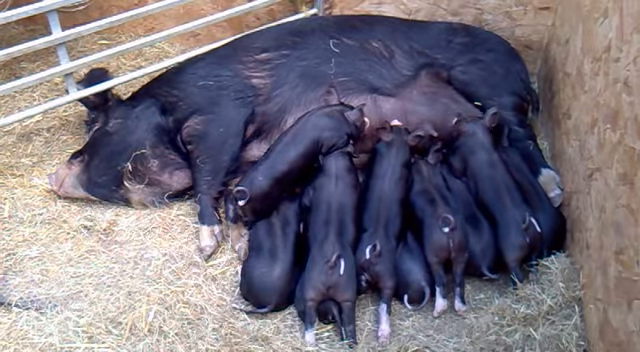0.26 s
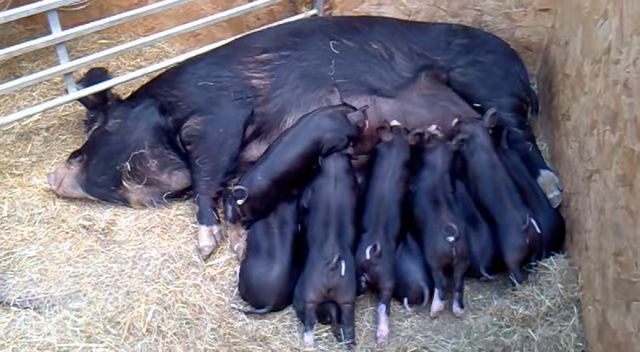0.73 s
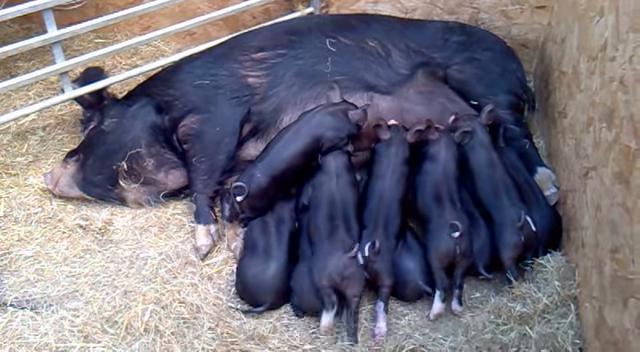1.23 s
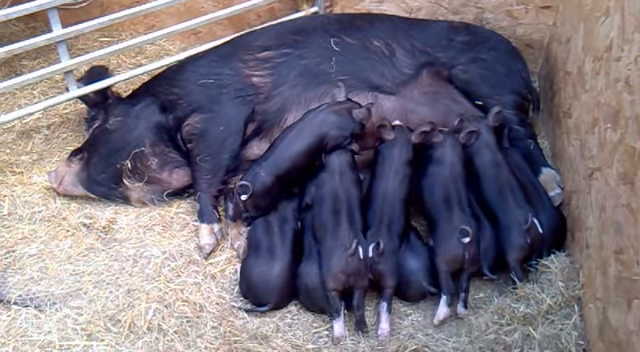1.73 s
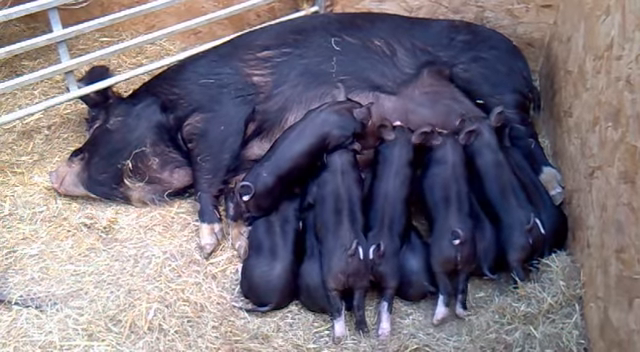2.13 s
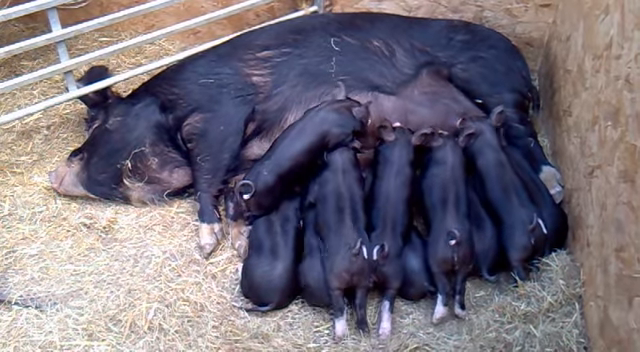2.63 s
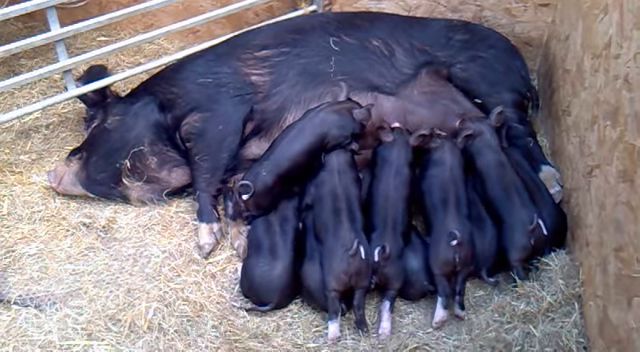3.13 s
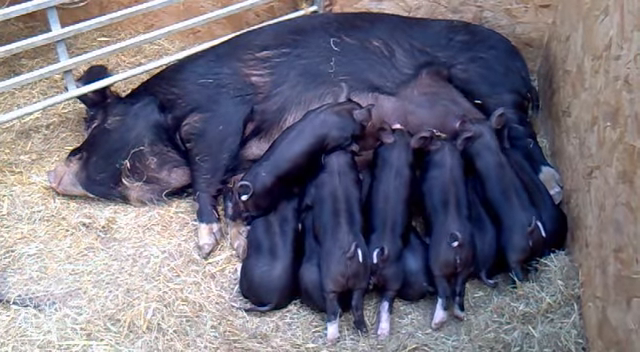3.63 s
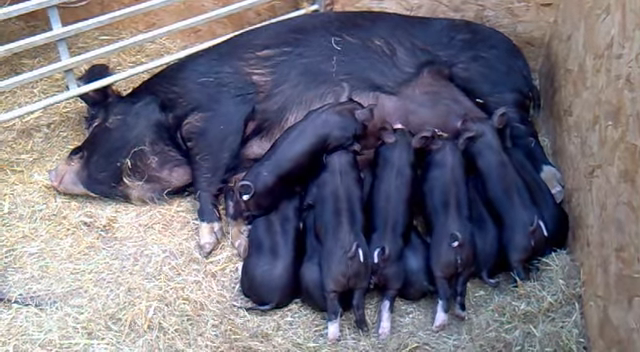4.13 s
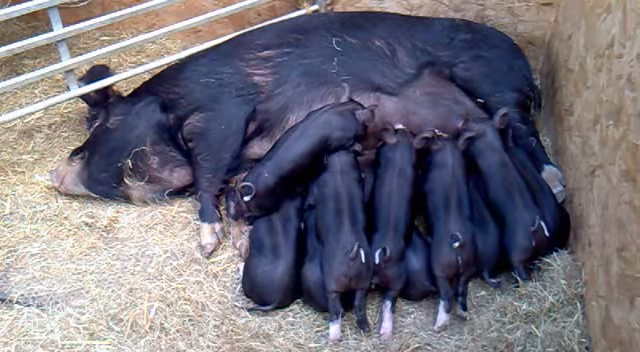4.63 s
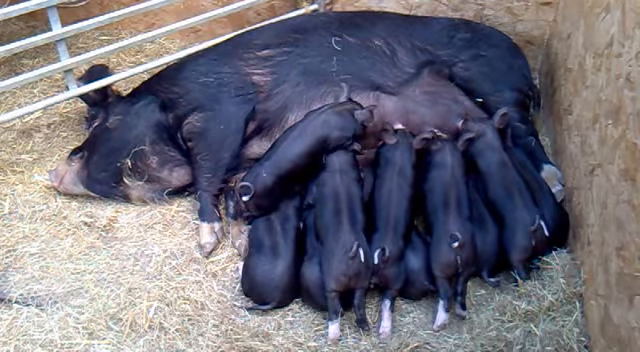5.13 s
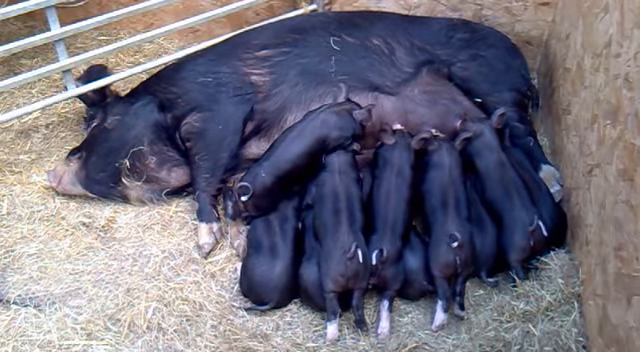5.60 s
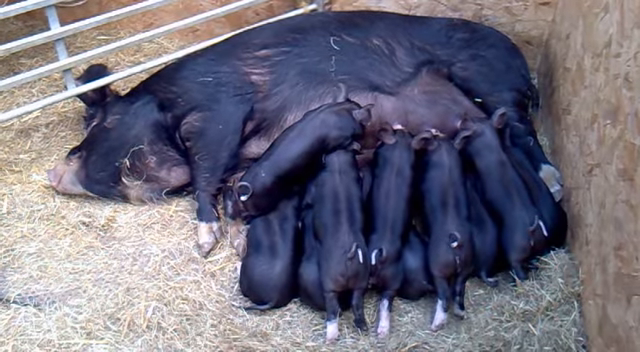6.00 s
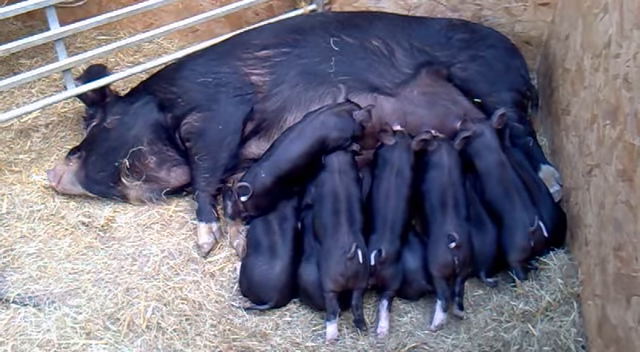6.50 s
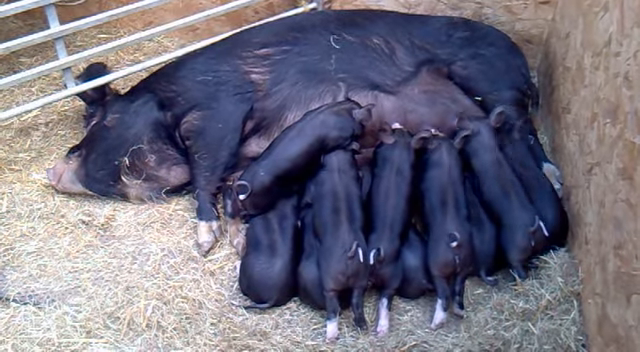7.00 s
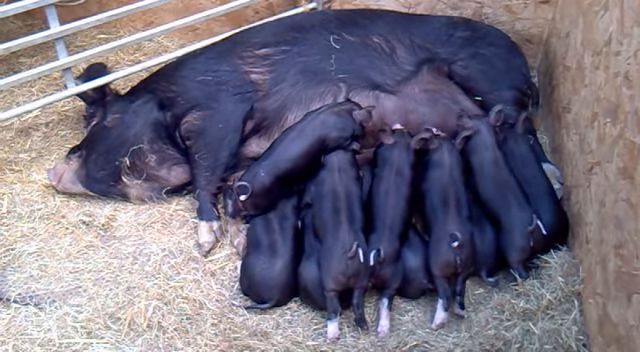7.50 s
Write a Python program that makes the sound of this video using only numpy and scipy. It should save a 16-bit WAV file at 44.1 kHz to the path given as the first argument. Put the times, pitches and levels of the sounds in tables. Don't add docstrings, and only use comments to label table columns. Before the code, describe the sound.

A big sow gives low, rattling grunts in quick bursts of three to five pulses while her piglets smack, gulp and rustle the straw.

```python
import sys
import numpy as np
from scipy import signal
from scipy.io import wavfile
from scipy.ndimage import uniform_filter1d

SR = 44100
rng = np.random.default_rng(int(sys.argv[2]) if len(sys.argv) > 2 else 0)


def output_pcm(signal):
    pcm = np.clip(np.atleast_2d(signal).T, -1, 1) * 32767
    wavfile.write(sys.argv[1], SR, np.round(pcm).astype(np.int16))


def gain_from_db(level_db):
    decades = np.asarray(level_db, float) / 20
    return 10 ** decades


N = 341775

# delay from the snap in ms, signed gain.
REFLECTIONS = [(-6.6, -.5), (-3.7, -.45), (-1.5, .47), (1.5, -.54), (5.06, .6), (5.97, -1), (8.28, -.46),
               (11.4, .57), (12.54, -.72), (18.2, -.68), (19.34, .73), (20.57, -.59), (25.47, -.47)]


def at_hz(points, hz):
    table_hz, values = np.transpose(points)
    return np.interp(np.log(hz), np.log(table_hz), values)


def in_time(rows):
    s, *columns = np.transpose(rows)
    return [np.interp(np.arange(N) / SR, s, c) for c in columns]


def rms_one(x):
    return x / np.sqrt(np.mean(x ** 2) + 1e-20)


def resonance(x, hz, width_hz):
    r = np.exp(-np.pi * width_hz / SR)
    top = [(1 - r * r) / 2, 0, (r * r - 1) / 2]
    return signal.lfilter(top, [1, -2 * r * np.cos(2 * np.pi * hz / SR), r * r], x + 1e-18)


def butter(x, hz, kind, order=2):
    return signal.sosfilt(signal.butter(order, hz, kind, fs=SR, output="sos"), x)


def clicks(s, sizes):
    out, at = np.zeros(N), np.round(s * SR).astype(int)
    np.add.at(out, at[at >= 0], sizes[at >= 0])
    return out


def drift(rate_hz):
    return rms_one(butter(rng.standard_normal(N + SR), rate_hz, "low")[SR:])


def banded(spectrum, patchy_db):
    white, together = rng.standard_normal((2, N)), drift(1.4)
    edges = 22 * 2 ** np.arange(0, 9.6, .5)
    out = np.zeros(N)
    for k, (low, high) in enumerate(zip(edges, edges[1:])):
        level_db = at_hz(spectrum, np.sqrt(low * high)) + patchy_db * (together + drift(45.0))
        out += gain_from_db(level_db) * butter(white[k % 2], [low, high], "band")
    return rms_one(out)


def bursts(rows, spread, attack_s):
    out, t = np.zeros(N + SR), np.arange(SR // 4) / SR
    white = rng.standard_normal((len(rows), len(t)))
    for (s, db, hz, t60), noise in zip(rows, white):
        shape = (1 - np.exp(-t / attack_s)) * gain_from_db(-60 * t / t60)
        burst = butter(noise * shape, [hz / spread, min(hz * spread, .45 * SR)], "band")
        out[round(s * SR):][:len(t)] += gain_from_db(db) * burst / abs(burst).max()
    return out[:N]


def pen(x, from_s, damping=1):
    # frequency in Hz, reverberation time (t60) in s.
    decay = [(100, 0.26), (300, 0.34), (700, 0.29), (1800, 0.2), (5000, 0.19)]
    t, edges = np.arange(SR // 2) / SR, 40 * 2 ** np.arange(0, 9.)
    white = rng.standard_normal(len(t))
    tail = np.zeros(len(t))
    for low, high in zip(edges, edges[1:]):
        t60 = at_hz(decay, np.sqrt(low * high))
        tail += butter(white, [low, high], "band") * gain_from_db(-60 * damping * t / t60)
    tail *= np.clip((t - from_s) / .012, 0, 1)
    return signal.fftconvolve(x, tail / np.linalg.norm(tail))[:N]


def box(x):
    # mode frequency in Hz, level in dB, t60 in s.
    air_modes = [(149.8, -10, 0.317), (177.4, 2, 0.19), (271.1, -1, 0.2), (379.5, -2, 0.26),
                 (412.5, 0, 0.31), (490.2, 6, 0.17), (557, 12, 0.14), (614, 2.5, 0.23), (670, -2, 0.31),
                 (717, -24, 0.45), (738, 13, 0.14), (910, 7.5, 0.091), (940, -31, 0.11), (1049, 4, 0.17),
                 (1150, -1.5, 0.2), (1163, 4.5, 0.16), (1354, -14.5, 0.18)]
    t = np.arange(SR // 2) / SR
    build = np.clip((t - .016) / .016, 0, 1)
    phases = rng.uniform(0, 2 * np.pi, len(air_modes))
    rings = np.zeros(len(t))
    for (hz, db, t60), phase in zip(air_modes, phases):
        rings += gain_from_db(db - 60 * t / t60) * np.sin(2 * np.pi * hz * t + phase)
    return signal.fftconvolve(x, build * rings)[:N]


def barn():
    white = rng.standard_normal((2, N))
    rumble = gain_from_db(-74) * rms_one(butter(white[0], [12, 60], "band", order=1))
    drone_hz, width_hz = 262, 40
    drone = rms_one(resonance(resonance(white[1], drone_hz, width_hz), drone_hz, width_hz))
    return rumble + gain_from_db(-76) * drone * gain_from_db(2.7 * drift(4.0))


def straw():
    # start in s, peak level in dB, centre frequency in Hz, t60 in s.
    rustles = [(0.1994, -55, 5750, 0.72), (0.3347, -55, 4500, 0.46), (0.7847, -49, 5100, 0.19),
               (0.8144, -53, 8040, 0.098), (1.0976, -53, 4760, 0.45), (1.234, -54, 8540, 0.22),
               (1.5267, -40.5, 5000, 0.12), (2.4811, -42.5, 5870, 0.1), (2.9337, -53, 5050, 0.54),
               (4.7435, -53, 4300, 0.088), (4.978, -48, 5200, 0.13), (5.906, -60, 4970, 0.15),
               (6.151, -54, 4500, 0.13)]
    snaps = [
        (0.7861, -47.5, 5530, 0.03),
        (1.527, -50.5, 5390, 0.03),
        (2.4804, -33.5, 6100, 0.02),
    ]
    return bursts(rustles, spread=1.28, attack_s=0.0021) + bursts(snaps, spread=1.8, attack_s=0.00035)


def murmur(flap_s, effort_db):
    # time in s, level in dB.
    eagerness = [(0.0, -70), (0.47, -58), (0.72, -54.5), (2.35, -64.5), (2.7, -50), (3.2, -65.5),
                 (4.12, -76), (4.35, -61), (4.8, -56), (5.05, -66.5), (5.3, -71.5), (5.75, -64.5),
                 (6.05, -73), (6.5, -57), (7.05, -68), (7.75, -63)]
    # frequency in Hz, level in dB per Hz.
    breath = [(65, -72.5), (110, 1.5), (211, -6), (259, -7.5), (337, -4), (611, -1.5), (840, -4.5),
              (1120, -6), (3000, -31.5), (3900, -37), (6600, -120)]
    stir_t60_s = 0.79
    stir = signal.lfilter([gain_from_db(-60)], [1, -gain_from_db(-60 / (stir_t60_s * SR))], clicks(flap_s, gain_from_db(effort_db)))
    return np.hypot(gain_from_db(in_time(eagerness)[0] - 0.5), stir) * banded(breath, patchy_db=4.15)


def wheeze():
    # time of the crest in s, centre frequency in Hz, level in dB.
    crests = [
        (.2, 3730, -63),
        (1.15, 3560, -66.5),
        (2.2, 3670, -82),
        (4.72, 4120, -67),
    ]
    rise_db_s, fall_db_s = 32.5, 46.5
    t = np.arange(N) / SR
    crest, hz, db = np.transpose(crests)[:, :, None]
    swells = db - np.maximum(rise_db_s * (crest - t), fall_db_s * (t - crest))
    hz, db = hz[swells.argmax(axis=0), 0], swells.max(axis=0)
    return gain_from_db(db + 2.1 * drift(28.0)) * drift(260.0) * np.sin(2 * np.pi * np.cumsum(hz) / SR)


def hum():
    # time in s, pitch in Hz, level in dB.
    glide = [
        (7.55, 235, -87),
        (7.562, 254, -53),
        (7.596, 267, -47),
        (7.66, 253, -78),
    ]
    t = np.arange(N) / SR
    hz, db = in_time(glide)
    sounding = np.clip(np.minimum(t - glide[0][0], glide[-1][0] - t) / 0.012, 0, 1)
    phase = 2 * np.pi * np.cumsum(hz + 9 * drift(32.0)) / SR
    return sounding * gain_from_db(db - 3.5 + 3.7 * drift(50.0)) * np.sin(phase)


def mouths():
    # start in s, peak level in dB, centre in
    # Hz, t60 in s.
    smacks = [(0.456, -39.5, 440, 0.14), (0.528, -36, 407, 0.1), (1.284, -44, 437, 0.11),
              (1.692, -53, 496, 0.12), (1.786, -46.5, 480, 0.23), (2.101, -49.5, 754, 0.23),
              (2.299, -42.5, 450, 0.15), (3.217, -52, 650, 0.079), (3.523, -42, 507, 0.28),
              (3.56, -45, 506, 0.046), (3.86, -47.5, 999, 0.16), (3.947, -62, 626, 0.32),
              (4.169, -50.5, 480, 0.42), (4.434, -40.5, 650, 0.25), (4.561, -49, 427, 0.1),
              (4.791, -44.5, 420, 0.12), (5.356, -42, 520, 0.16), (5.392, -45.5, 484, 0.054),
              (6.006, -59, 406, 0.62), (6.256, -47, 675, 0.094), (6.337, -48, 614, 0.12),
              (6.573, -46, 420, 0.11), (6.776, -46, 925, 0.092), (6.866, -47.5, 520, 0.079),
              (7.031, -53, 615, 0.055), (7.132, -41.5, 504, 0.22), (7.644, -55, 615, 0.09)]
    low_rustles = [(0.7853, -50.5, 1870, 0.29), (1.2374, -50, 2330, 0.21), (1.527, -30, 1770, 0.13),
                   (1.694, -51, 2020, 0.1), (2.1041, -48.5, 2010, 0.14), (2.4818, -35, 2000, 0.092),
                   (3.0383, -48.5, 3450, 0.14), (4.4335, -55, 2100, 0.21), (4.4335, -53, 3180, 0.16),
                   (5.3578, -54.5, 2030, 0.16), (6.7785, -49, 3500, 0.088), (7.1332, -55.5, 1930, 0.099)]
    pops = [
        (0.25, -58.5, 7650, 0.34),
        (0.659, -40, 535, 0.12),
        (5.169, -81, 584, 0.1),
        (5.269, -62, 1440, 0.067),
        (6.299, -67, 680, 0.1),
        (6.827, -55, 1420, 0.065),
        (6.932, -47, 1300, 0.16),
        (6.99, -54.5, 1260, 0.053),
        (7.576, -44.5, 600, 0.081),
    ]
    sound = bursts(smacks, spread=1.365, attack_s=0.0021) + bursts(low_rustles, spread=1.187, attack_s=0.00054)
    sound += bursts(pops, spread=1.12, attack_s=0.00073)
    s, db = np.transpose(smacks)[:2]
    return sound + gain_from_db(33.5) * butter(clicks(s + 0.00565, gain_from_db(db)), [90, 200], "band")


def litter(flap_s, effort_db):
    small = mouths() + straw() + hum()
    return small + gain_from_db(-12.5) * pen(small, 0.0013) + wheeze() + murmur(flap_s, effort_db)


def flaps():
    # first flap in s, number of flaps, first gap in ms, change of gap per flap in ms.
    grunts = [(0.0028, 4, 34.7, -0.8), (0.513, 3, 34.2, 1.9), (0.8439, 4, 36.2, -0.9),
              (1.3639, 5, 33.5, -0.1), (1.8582, 4, 32.8, -0.1), (2.3736, 3, 32.6, 2.1),
              (2.6113, 4, 46.5, -7.8), (2.8824, 3, 38.5, -3.7), (3.6203, 4, 38.7, -3.0),
              (4.2293, 3, 31.9, 3.2), (4.5897, 3, 38.9, -3.0), (4.8197, 3, 39.2, -3.2),
              (5.4413, 4, 34.2, -0.2), (6.053, 3, 39.4, -4.8), (6.3589, 3, 37.9, -3.0),
              (6.6031, 3, 39.4, -3.6), (7.2058, 5, 35.0, -0.6)]
    # crest effort in dB, flap of the crest (from 0), snout against effort in dB,
    # extra force of the opening flap in dB.
    voices = [(6, 1.5, -5, 2), (5, 2.1, -4.5, -2.5), (0.5, 2, -9, 5.5), (5.5, 2.2, -3.5, 0.5),
              (7, 2.1, -8, 8.5), (5.5, 1.8, -6.5, 4.5), (0.5, 2.3, -7, 7), (-4, 2, -8, 7),
              (5.5, 1.5, -4.5, -1.5), (3.5, 1.5, -11, -0.5), (-5.5, 1.2, -7, 1.5), (-3.5, 2, -9, 6),
              (4, 2.2, -5, -2), (3.5, 1.6, -5.5, -3), (-3, 1.6, -11, 0), (-6.5, 2, -13, 6.5),
              (5.5, 2.1, -5.5, 2.2)]
    pinched_at = [0.17, 0.96, 1.3, 1.34, 0.78, 0.66, 2.6, 1.6, 0.35, 0.39, .7, 1.6, 1.36, 0.7, 1.2, 1.5,
                  0.87]
    rows = []
    for grunt, voice, pinched in zip(grunts, voices, pinched_at):
        s, count, gap_ms, change_ms = grunt
        crest_db, crest, snout_db, opening_db = voice
        k = np.arange(round(count))
        times = s + (k * gap_ms + k * (k - 1) / 2 * change_ms) / 1000
        climb = (5 + 0.22 * crest_db) * np.maximum(crest - k, 0) ** 2
        fade = 4.5 * np.maximum(k - crest, 0)
        opening = opening_db * (k == 0)
        width_flaps = 0.72
        pinch = max(1 + 2.74 * crest_db, 0) * np.exp(-((pinched - k) / width_flaps) ** 2)
        swell = crest_db - climb - fade
        bright = swell + 2.03 * opening
        mouth_db = bright - 2 + 0.61 * snout_db - 0.74 * pinch
        rows += zip(times, swell + opening, bright + snout_db - pinch, mouth_db)
    return np.transpose(rows)


def throat(s, effort_db):
    # frequency in Hz, width in Hz, level in dB.
    formants = [(170.3, 28, -3), (437, 108, 3), (645, 181, 2.5), (919.7, 37.6, 4.5), (1121, 41.5, -1),
                (1354, 62, -8.5)]
    flap = clicks(s, gain_from_db(effort_db))
    puff = signal.lfilter([1], [1, -np.exp(-1 / (0.018 * SR))], flap) * rng.standard_normal(N)
    source = sum(gain * clicks(s + ms / 1000, gain_from_db(effort_db)) for ms, gain in REFLECTIONS)
    source += gain_from_db(-9.0) * pen(flap, from_s=0.015) + gain_from_db(-21.5) * puff
    modes = [(-1) ** k * gain_from_db(db) * resonance(source, hz, width) for k, (hz, width, db) in enumerate(formants)]
    voiced = sum(modes[:3]) + gain_from_db(0.1) * sum(modes[3:])
    heave = clicks(s + .012, gain_from_db(effort_db))
    chest = gain_from_db(4.0) * resonance(heave, 56.6, 5.9) + resonance(heave, 33, 3.8)
    chest += gain_from_db(-2.0) * resonance(heave, 87, 23)
    chest += gain_from_db(-44) * butter(pen(heave, from_s=0.026), 93, "low")
    return gain_from_db(5.5) * (chest - butter(voiced, 2500, "low", order=4)) + gain_from_db(-37.5) * box(flap)


def snout(s, snap_db, mouth_db):
    # frequency in Hz, width in Hz, level in dB.
    cavities = [(1460, 42, -16), (1713, 54, -8), (2060, 65, 1.5), (2360, 114, -5.5), (2710, 26, -8.5),
                (3216, 41, -7), (3500, 41, -11), (3810, 81, -12.5), (4290, 140, -17.5), (4810, 26, -17),
                (5200, 18, -20.5), (7130, 43, -25.5), (7900, 44, -32)]
    luck_db = rng.normal(0, 2.5, (len(s), len(cavities)))
    slip_s = rng.normal(0, .0009, luck_db.shape)
    rasp = rng.standard_normal((2, N))
    mouth, nose = np.zeros((2, N))
    for k, (hz, width, db) in enumerate(cavities):
        in_mouth = hz < 2900
        if in_mouth:
            drive_db, lag_s, hiss_db, wide = mouth_db, .001, -25, width * 3.2
        else:
            drive_db = snap_db * (1 + 0.2 * (hz - 3200) / 1000) + 4.5
            lag_s = min(.005 * (hz - 3200) / 1200, .007) - .002
            hiss_db, wide = -29, width * 4.0
        size = (-1) ** k * gain_from_db(db + drive_db + luck_db[:, k])
        push = clicks(s + lag_s + slip_s[:, k], size)
        push += gain_from_db(hiss_db) * rasp[k % 2] * signal.lfilter([1], [1, -np.exp(-1 / (0.01 * SR))], push)
        mode = resonance(resonance(push, hz, wide), hz, wide)
        if in_mouth:
            mouth = mouth + mode
        else:
            nose = nose + mode
    paths = sum(gain * clicks(np.array([ms / 1000]), np.ones(1)) for ms, gain in REFLECTIONS)[:SR // 20]
    echoes = signal.fftconvolve(gain_from_db(-13.0) * mouth + gain_from_db(-16) * nose, paths)[:N]
    diffuse = pen(gain_from_db(-3.5) * mouth + gain_from_db(-8.0) * nose, from_s=0.00067, damping=0.84)
    return gain_from_db(9) * (gain_from_db(-3.5) * mouth + gain_from_db(-1.0) * nose + echoes + diffuse)


def scene():
    s, effort_db, snap_db, mouth_db = flaps()
    sow = throat(s, effort_db) + snout(s, snap_db, mouth_db)
    return (barn() + litter(s, effort_db) + sow)[None]


def band_limit(x):
    return signal.sosfilt(signal.butter(12, 15890, fs=SR, output="sos"), x)


def record(dry):
    # frequency in Hz, level in dB per Hz.
    hiss_spectrum = [(880, -37), (1500, -1), (2810, -4.5), (3930, -1.5), (8390, -8), (15100, -5.5),
                     (15700, -12)]
    level_db = 10 * np.log10(uniform_filter1d(dry[0] ** 2, size=600) + 1e-7)
    fall = 90 * np.arange(N) / SR
    held_db = np.maximum.accumulate(level_db + fall) - fall
    rests_db = -62.5
    hiss_db = -73 + 0.31 * (np.maximum(held_db, rests_db) - rests_db)
    hiss = gain_from_db(hiss_db) * banded(hiss_spectrum, patchy_db=0.35)
    return band_limit(butter(dry, 9900, "low", order=4) + hiss - .0003)


dry = scene()
out = record(dry)
output_pcm(out)
```